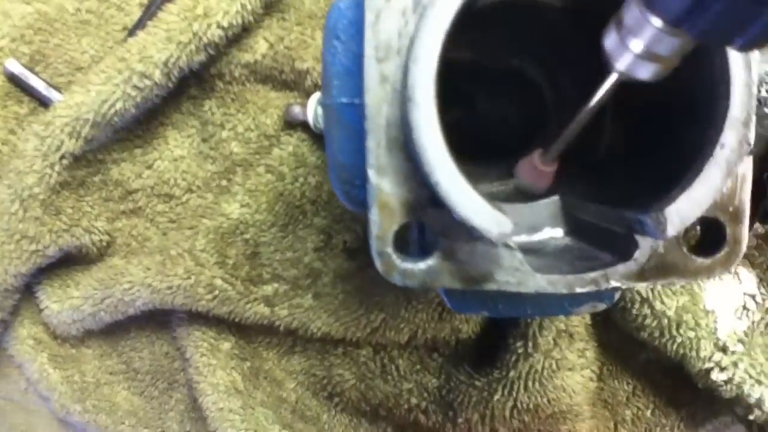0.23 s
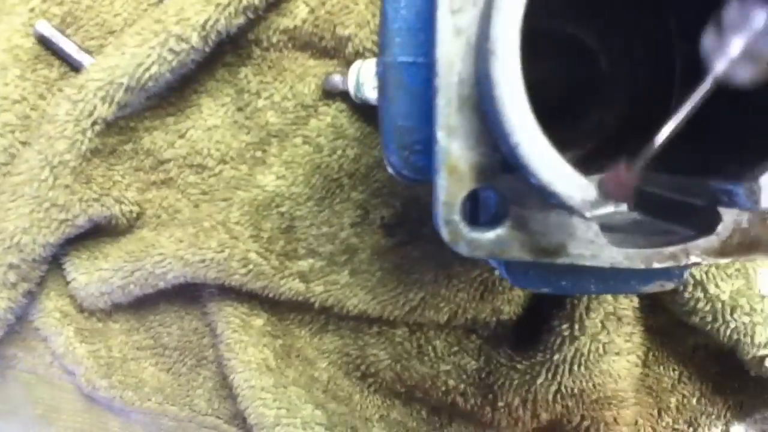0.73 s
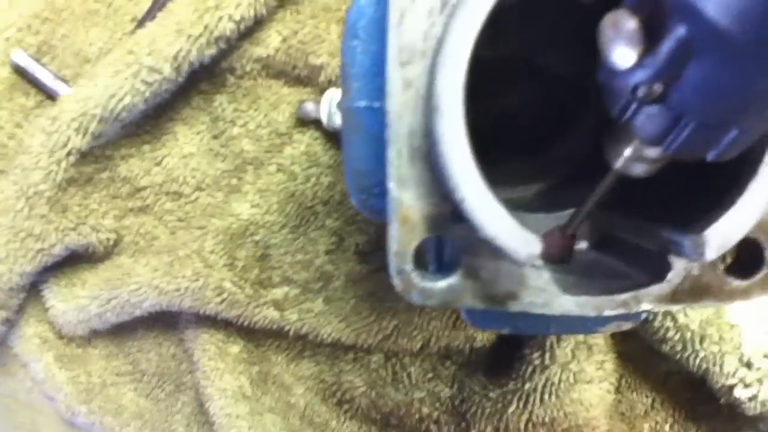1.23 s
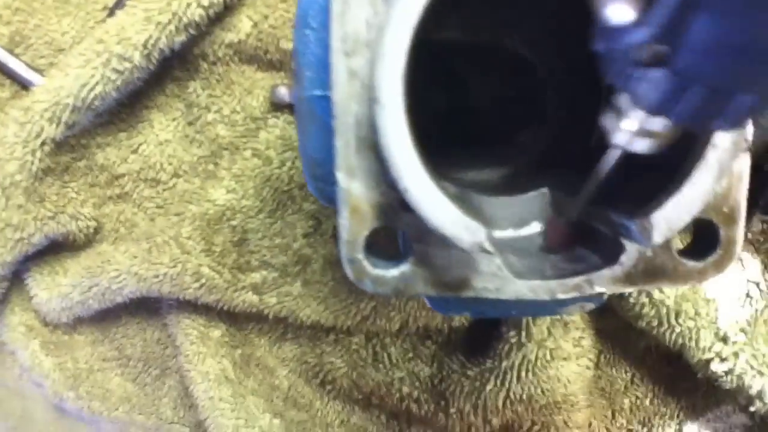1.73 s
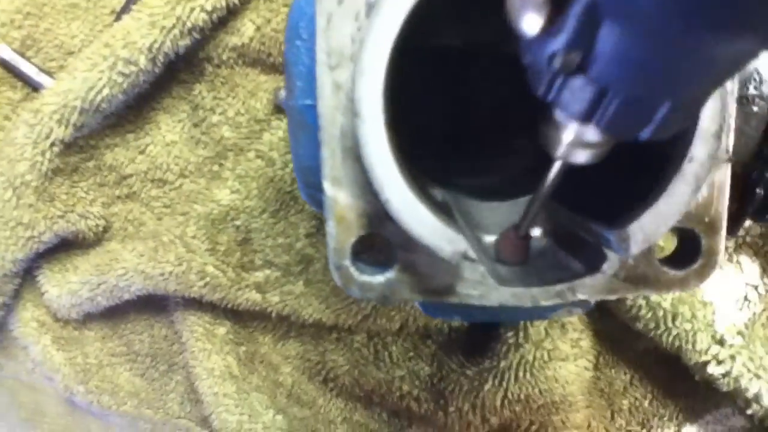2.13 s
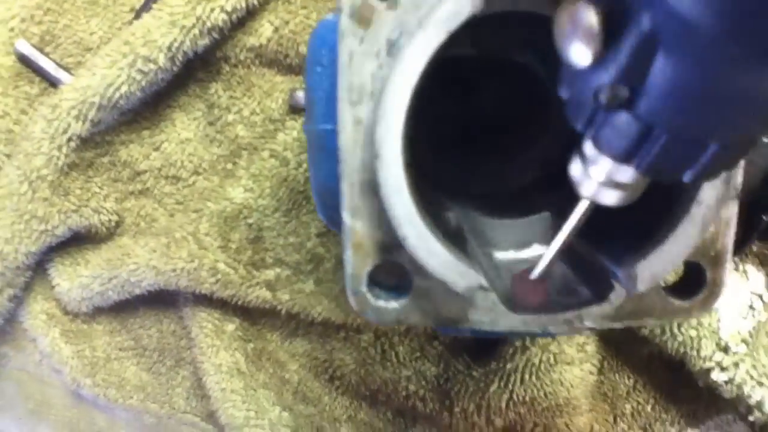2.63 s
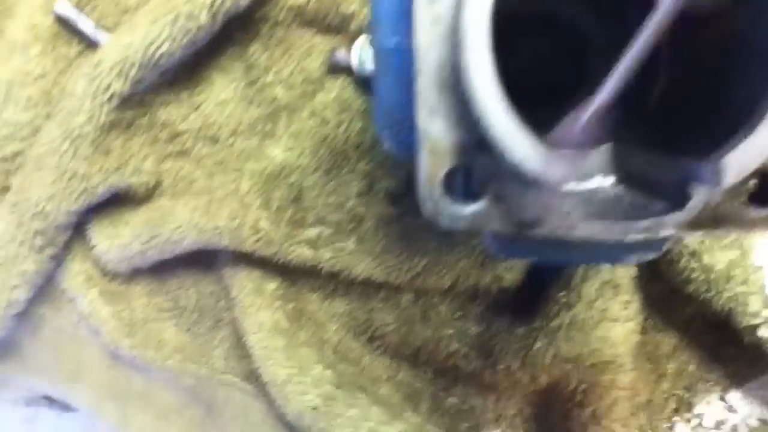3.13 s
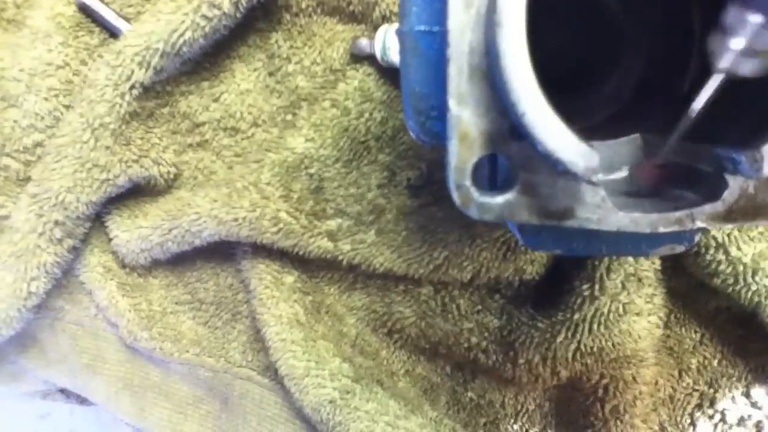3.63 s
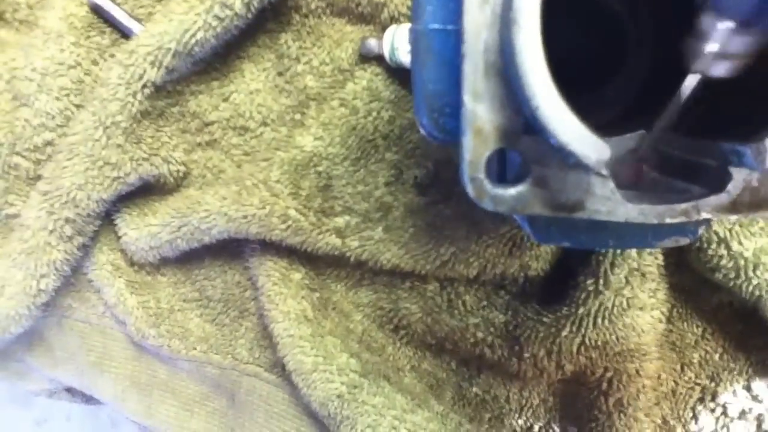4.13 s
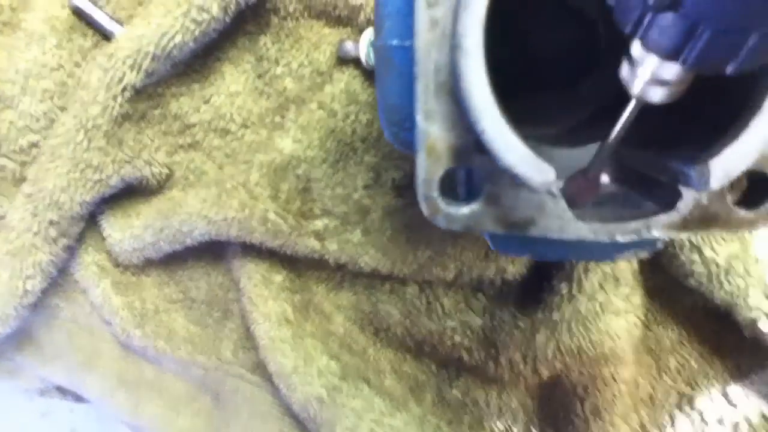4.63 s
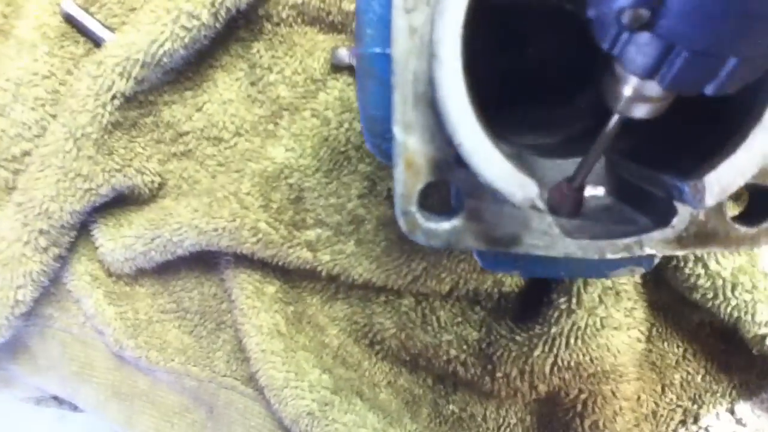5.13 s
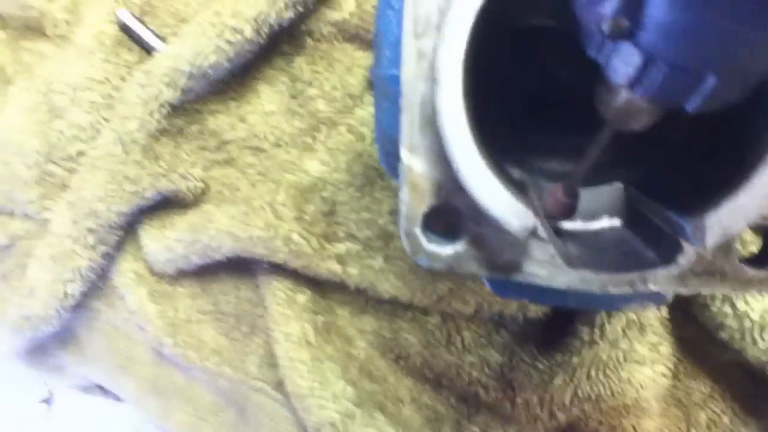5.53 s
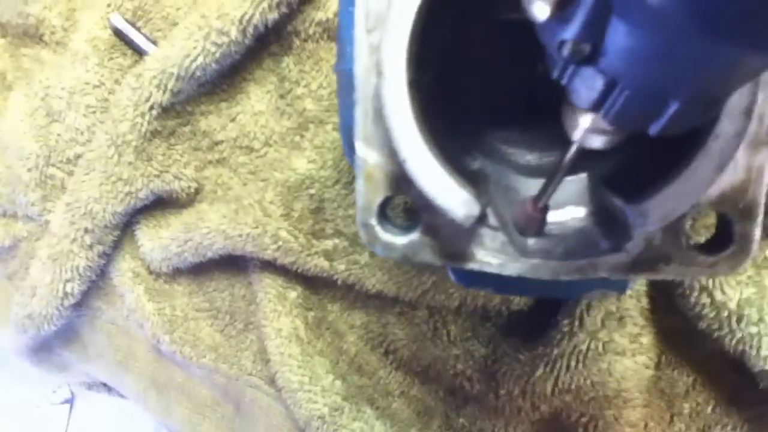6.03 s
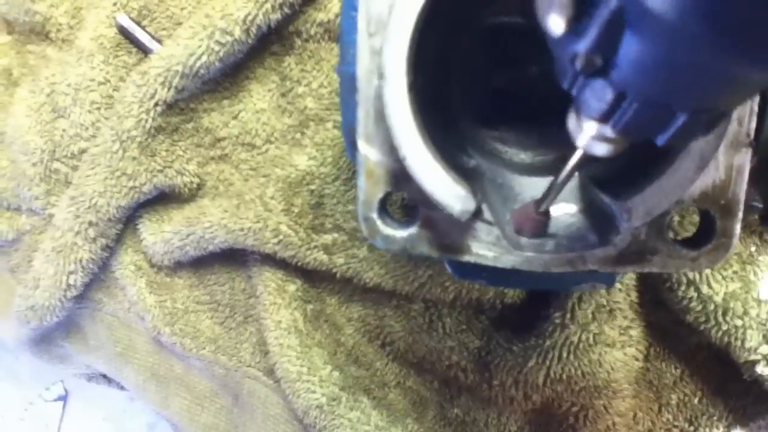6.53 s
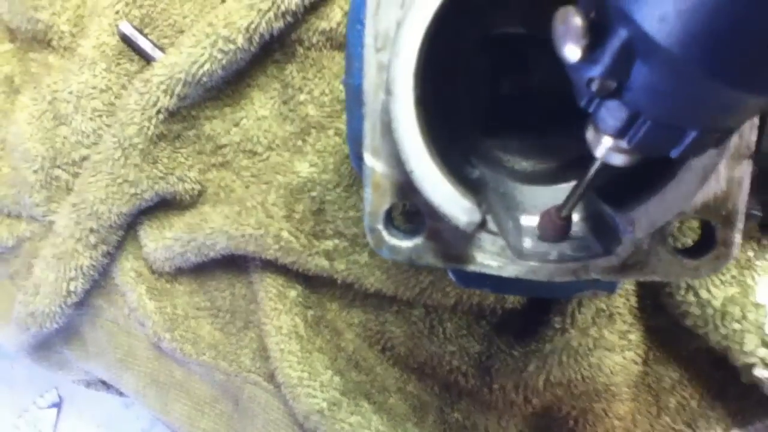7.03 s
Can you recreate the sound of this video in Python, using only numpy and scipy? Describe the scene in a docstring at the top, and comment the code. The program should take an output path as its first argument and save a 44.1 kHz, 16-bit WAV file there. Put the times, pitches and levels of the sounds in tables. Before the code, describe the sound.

A small rotary tool whines at high pitch while its stone bit grinds metal with a rough, ringing, hissing scrape.

```python
"""Beside an engine cylinder, a handheld rotary tool runs free, then its stone bit grinds the rim.
Grit tears at the metal once or twice a turn: it scrapes, hisses and rings the cylinder's metal liner
near 5.7 kHz. Now and then the stone skips off. The motor whines at multiples of its shaft speed
and rattles its housing. A phone close by limits the peaks."""
import sys
import numpy as np
from scipy import signal
from scipy.fft import rfft, irfft
from scipy.io import wavfile
from scipy.ndimage import uniform_filter1d, minimum_filter1d

SR = 44100
rng = np.random.default_rng(int(sys.argv[2]) if len(sys.argv) > 2 else 0)


def to_wav(s):
    """Save 16-bit WAV."""
    ch = np.atleast_2d(s).T  # columns
    pcm = np.round(np.clip(ch, -1, 1) * 32767)  # PCM
    wavfile.write(sys.argv[1], SR, pcm.astype(np.int16))


N = 321930
T = np.arange(N) / SR

# each touch of the stone (lands [s], lifts [s], firmness [0-1], landing blow [dB], strength [dB])
TOUCHES = [(.934, 0.961, 0.5, 15, 3), (0.976, 1.012, 0.7, 16, 2.5), (1.018, 1.05, 0.5, 11, 0),
           (1.05, 1.065, 0.4, 9, -2.5), (1.095, 1.134, 0.2, 11, -0.5), (1.14, 1.193, 0.5, 2, -1),
           (1.19, 2.04, 0.84, 5, -0.5), (2.078, 2.807, 0.96, 7, 0), (2.857, 2.975, 0.8, 7.5, -1),
           (2.967, 3.042, 0.4, 3, -2), (3.047, 3.073, .6, 5, 0.5), (3.093, 3.13, 0.5, -11, 4.5),
           (3.138, 3.164, 0.6, 0, 4.5), (3.653, 3.781, 1, 8, 1.5), (3.794, 3.973, 0.8, 4, -0.5),
           (3.982, 5.356, 0.76, 6, 0.5), (5.351, 5.888, 0.82, 8, 0), (5.896, 7.4, 0.9, -1, 0)]
# the hand digs in (+) or eases off (-) (time [s], half-width [s], strength change [dB])
HAND_PUSHES = [(1.517, 0.05, 2.5), (1.544, 0.013, -5.5), (1.71, 0.026, 2.5), (2.0, 0.023, 1),
               (2.097, 0.026, -3.5), (2.18, 0.013, -0.5), (3.115, 0.009, 4.5), (2.59, 0.062, 1),
               (2.894, 0.021, -3.5), (3.91, .03, 0), (4.23, 0.025, 0), (4.702, 0.019, 0.5),
               (5.14, 0.025, 0), (4.295, .02, 0), (4.604, 0.017, 2), (5.302, .015, 1), (5.54, 0.017, 0.5),
               (5.58, .015, -3), (6.31, 0.015, 1), (6.52, 0.017, 0.5), (2.215, 0.024, 1), (3.847, 0.035, 3),
               (3.962, 0.019, 5), (3.99, 0.021, -3), (4.93, 0.026, 2), (5.93, 0.061, -4.5),
               (6.067, .03, -2), (6.426, 0.032, -2), (6.553, 0.013, -1.5)]
# base levels of the grinding (time [s], scrape [dB], ring [dB], hiss [dB])
GRIND_LEVELS = [(.93, -21.5, -17.5, -27.5), (1.15, -20.5, -20, -24.5), (1.22, -15, -15.5, -15),
                (1.45, -20.5, -19, -19.5), (1.7, -19.5, -14, -20.5), (2.0, -17.5, -17, -17.5),
                (2.25, -18.5, -13, -19), (2.5, -20.5, -11.5, -21), (2.8, -20.5, -14, -21),
                (2.9, -19, -21, -24.5), (3.2, -25, -26, -28.5), (3.66, -22, -14.5, -21),
                (4.4, -20, -14, -19), (4.45, -22.5, -13, -21.5), (5.0, -20.5, -15.5, -22),
                (5.2, -18, -14, -19), (5.43, -23, -23, -25.5), (5.8, -14, -15.5, -15.5),
                (6.0, -16, -13, -14.5), (6.3, -16, -11, -15.5), (6.45, -17.5, -13, -19.5),
                (7.3, -17.5, -12.5, -17)]
# where the bit is (time [s], place [0 at the edge of the port opening, 1 further round the rim])
BIT_PLACE = [(.9, 0.12), (1.3, 0.52), (3.0, 0.39), (3.65, .3), (4.0, 0.52), (4.5, 0.26), (5.2, 0.23),
             (5.5, 0.97), (7.3, 0.72)]
# the liner's ringing notes (pitch [Hz], width [Hz], at the port [dB], round the rim [dB], sign [+/-1])
LINER_NOTES = [(5225, 40, -11, -10, 1), (5372, 55, -12, -12, -1), (5525, 52, 0, 0, 1),
               (5645, 40, -7, -9, 1), (5725, 40, -4, -8, 1), (5835, 70, -4, -5, 1), (5935, 60, 1, -7, -1),
               (6160, 45, -25, -11, -1), (6830, 150, -25, -21, 1)]
# grit heard through the tool and the cylinder's body (frequency [Hz], relative level [dB])
SCRAPE_SPECTRUM = [(40, -71), (150, -29.5), (320, -19.5), (600, -20), (1000, -6), (1600, 0), (1900, -3),
                   (2300, -6), (2750, -4), (3150, -1), (3700, 2), (4200, -1.5), (5000, 5), (6400, -26)]
# the grit's high hiss (frequency [Hz], relative level [dB])
HISS_SPECTRUM = [(4500, -33.5), (6300, -2.5), (7000, 3.5), (7700, -1.5), (8500, 2.5), (9200, -3.5),
                 (10300, -5.5), (11000, -0.5), (11700, 4.5), (12400, 1.5), (13300, -20), (13700, -0.5),
                 (14200, -30.5)]
# how the hiss changes round the rim (frequency [Hz], relative change [dB])
RIM_HISS_CHANGE = [(6300, -0.5), (7600, -5.5), (8700, -1.5), (9100, 11.5), (9600, 3.5), (11700, -5.5),
                   (13000, -7), (14200, -1)]
# the motor's shaft (time [s], speed [turns/s], base level of its lowest tone [dB])
MOTOR_RUN = [(0, 206.8, -37), (.92, 206.9, -38.5), (.97, 205.9, -47), (1.2, 205.7, -46), (1.36, 196.5, -54),
             (1.6, 199.4, -49), (2.05, 196.3, -52), (2.57, 196.8, -52), (2.72, 190.5, -56),
             (3.1, 199.4, -43), (3.2, 199.9, -46), (3.4, 204.1, -45), (3.64, 205.7, -42), (3.7, 203.8, -51),
             (3.8, 200.9, -55), (3.92, 190.8, -60), (4.1, 190.8, -58), (4.26, 195, -56), (4.45, 191.5, -57),
             (4.82, 192, -58), (4.92, 188.8, -58), (5.2, 191, -54), (5.5, 200.6, -47), (5.72, 203.3, -44),
             (5.9, 191.5, -56), (6.1, 193.4, -46), (6.25, 192.8, -46), (6.42, 190.4, -52),
             (6.62, 195.2, -52), (6.9, 191, -53), (7.3, 189.6, -52)]
# the motor's lower tones (multiple of shaft speed [x], relative level [dB])
LOW_TONES = [(1, -11), (2, -28), (3, -22.5), (4, -18), (5, -1), (6, -10), (7, -9.5), (8, -4), (9, -8),
             (10, -10), (11, -5.5), (12, -14.5)]
# its strongest upper tones (multiple of shaft speed [x], relative level [dB])
HIGH_TONES = [(13, -9), (15, -8), (18, -7), (33, -8), (45, -14), (56, -16), (60, -12), (67, -19)]
# side load on the bearings shifts some tones {multiple of shaft speed [x]: change at full load [dB]}
BEARING_SHIFTS = {3: -0.5, 5: -10, 6: 2.5, 8: -1, 9: 3}
# tone of the bit rocking twice a turn (time [s], level [dB])
ROCKING_LEVELS = [(0, -61.5), (.92, -56), (.97, -61), (4.0, -61), (4.75, -57), (4.92, -48), (5.2, -57),
                  (5.5, -77), (6.5, -59), (6.9, -42.5), (7.3, -46)]
# the housing's rattle (frequency [Hz], relative level [dB])
HOUSING_SPECTRUM = [(40, -31), (150, -28.5), (650, -29.5), (850, -14), (1850, -12), (2300, -1.5),
                    (2600, -7.5), (3750, 0.5), (4050, -8.5), (4800, -8.5), (5800, -9.5), (7700, -19),
                    (9200, -14.5), (10300, -27.5), (11900, -29), (12400, -19), (14200, -28)]


def grinding(turns, hop_db, place, scrape_gain, ring_db, hiss_db):
    """The same tearing grit makes the ring, the scrape and the hiss."""
    tearing = ticks(turns, per_s=5000, spread_db=1.5, once=.1, twice=.33, noise=1.5)
    grit = unit(undb(hop_db + .85 * wander(150)) * tearing)
    ring = liner_ring(grit, place, ring_db)
    port_hiss = colour(grit, HISS_SPECTRUM)
    hiss = (1 - place) * port_hiss + place * colour(port_hiss, RIM_HISS_CHANGE)
    return ring + scrape_gain * colour(grit, SCRAPE_SPECTRUM) + undb(hiss_db) * hiss


def liner_ring(grit, place, ring_db):
    """Grit rings the liner like a bell; each note is reached more or less well as the bit wanders."""
    ring = 0
    for hz, width, port_db, rim_db, sign in LINER_NOTES:
        b, a = signal.iirpeak(hz, hz / width, fs=SR)
        reach_db = port_db + place * (rim_db - port_db) + 1.5 * wander(5)
        ring += sign * signal.lfilter(b, a, grit * undb(ring_db + reach_db))
    return unit(ring) * np.sqrt(np.mean(undb(ring_db) ** 2))


def stone_contact(land_s=.003, lift_s=.011):
    """The stone lands fast and lifts more slowly. Gives firmness, touch (0 off, 1 on) and strength."""
    firmness, touch, strength_db = np.zeros((3, N))
    for lands, lifts, firm, _, db in TOUCHES:
        on = np.clip((T - lands) / land_s, 0, 1) * np.exp(-np.maximum(T - lifts, 0) / lift_s)
        firmness = np.maximum(firmness, firm * on)
        touch = np.maximum(touch, on)
        strength_db[T >= lands] = db
    for time, half_width, db in HAND_PUSHES:
        strength_db += db * np.exp(-((T - time) / half_width) ** 2)
    return firmness, touch, strength_db


def stone_hops(shaft_hz, hops_per_s=68):
    """Level swings in dB as the stone hops; a lightly pressed, faster bit hops harder."""
    hops = np.cumsum(hops_per_s * (1 + .2 * wander(40))) / SR
    size = .3 + .7 * rng.random(N // 200)[hops.astype(int)]
    depth = 2.2 * np.clip(5 + .9 * (shaft_hz - 192), 4, 15)
    part = hops % 1
    hit_and_fade = np.minimum(part / .2, 1) * np.exp(-part / .4) - .3
    hop_db = depth * size * hit_and_fade
    for lands, _, _, blow_db, _ in TOUCHES:  # a dip just before each landing, then a jump
        gap = np.abs(T - lands)
        hop_db += blow_db * np.where(T >= lands, np.exp(-gap / .006), -np.exp(-gap / .005))
    return hop_db


def motor_whine(turns, tone_db, rock_db, load):
    """The motor sings at multiples of its shaft speed; under load the tones waver and blur."""
    levels = {k: -15 - .093 * (k - 13) + 1.9 * rng.standard_normal() for k in range(13, 69)}
    levels.update({round(k): db for k, db in LOW_TONES + HIGH_TONES})
    # under load the upper tones lose less than the lowest one
    upper_db = load * (.68 * (tone_db[0] - tone_db) - 2)
    whine = undb(rock_db) * np.sin(4 * np.pi * turns)
    for k, db in levels.items():
        load_db = load * (BEARING_SHIFTS.get(k, 0) - 2.8 * (k > 9)) + upper_db * (k > 2)
        waver_db = (.96 + 2.9 * load * (k > 1)) * wander(12)
        blur = .5 * load * wander(25) * (k > 1)
        tone = np.sin(2 * np.pi * (k * turns + rng.random()) + blur)
        if k != 2:  # the rocking bit supplies the second tone
            whine += undb(tone_db + db - LOW_TONES[0][1] + load_db + waver_db) * tone
    return np.sqrt(2) * whine


def housing_rattle(turns):
    """Loose bearings and the bit's clamp knock the housing, mostly once a turn."""
    knocks = ticks(turns, per_s=2500, spread_db=2.2, once=.3, twice=.1, noise=.9)
    return colour(undb(2 * wander(150)) * knocks, HOUSING_SPECTRUM)


def ticks(turns, per_s, spread_db, once, twice, noise):
    """Random ticks of uneven size over smooth noise, harder at one or two places of each turn."""
    hits = (rng.random(N) < per_s / SR) * rng.standard_normal(N)
    sizes = undb(spread_db * np.minimum(rng.exponential(size=N), 3))
    beat = np.exp(once * np.cos(2 * np.pi * turns) + twice * np.cos(4 * np.pi * turns))
    return unit(beat * (unit(hits * sizes) + noise * rng.standard_normal(N)))


def colour(x, spectrum):
    """Give a sound the listed balance of low and high frequencies, at an average level of 1."""
    hz, db = np.transpose(spectrum)
    grid_hz = np.maximum(np.fft.rfftfreq(2048, 1 / SR), 1)
    gain = undb(np.interp(np.log(grid_hz), np.log(hz), db))
    cepstrum = irfft(np.log(gain))
    # fold it so the filter rings after each tick, never before
    cepstrum[1:1024] *= 2
    cepstrum[1025:] = 0
    response = irfft(np.exp(rfft(cepstrum)))
    return unit(signal.fftconvolve(x, response)[:N])


def wander(per_s):
    """A smooth random drift, about 1 in size, with per_s new values a second."""
    hold = int(SR / per_s)
    steps = np.repeat(rng.standard_normal(N // hold + 1), hold)
    return unit(uniform_filter1d(uniform_filter1d(steps, hold), hold)[:N])


def curves(table):
    """Turn a table's columns into curves over time."""
    times, *columns = np.transpose(table)
    return [np.interp(T, times, column) for column in columns]


def undb(db):
    """Turn decibels into a gain."""
    return 10 ** (np.asarray(db) / 20)


def unit(x):
    """Scale to an average (rms) level of 1."""
    return x / np.sqrt(np.mean(x ** 2))


def scene():
    """The motor runs throughout; grinding takes over from the rattle as the bit bites."""
    shaft_hz, tone_db = curves(MOTOR_RUN)
    scrape_db, ring_db, hiss_db = curves(GRIND_LEVELS)
    (place,), (rock_db,) = curves(BIT_PLACE), curves(ROCKING_LEVELS)
    firmness, touch, strength_db = stone_contact()
    load = uniform_filter1d(firmness, size=2000)
    turns = np.cumsum(shaft_hz * (1 + .0003 * wander(40))) / SR  # the speed trembles a little
    hop_db = stone_hops(shaft_hz)
    # off the metal, the rattle weakens as the shaft slows
    free_db = np.maximum(-17 + 2.5 * (shaft_hz - shaft_hz[0]), -28)
    body_db = touch * (scrape_db + strength_db) + (1 - touch) * free_db
    shake_db = .79 * np.sqrt(firmness) * hop_db  # each hop also shakes the housing
    rattle = undb(body_db + shake_db) * np.sqrt(1 - .64 * firmness) * housing_rattle(turns)
    scrape_gain = undb(body_db - 1.67) * np.sqrt(1.25 * firmness)
    touch_db = 20 * np.log10(np.clip(touch, 1e-3, 1))
    # ring and hiss follow strength more steeply than the scrape
    ring_db += 2.31 * strength_db + touch_db
    hiss_db += 1.74 * strength_db + touch_db
    stone = grinding(turns, hop_db, place, scrape_gain, ring_db, hiss_db)
    return (stone + motor_whine(turns, tone_db, rock_db, load) + rattle)[None]


def record(dry, low_hz=90, top_hz=14080, ceiling=.9):
    """The phone drops the deep bass, quickly turns down loud peaks and cuts the highest treble."""
    thin = signal.sosfilt(signal.butter(2, low_hz, "high", fs=SR, output="sos"), dry)
    safe_gain = np.minimum(1, ceiling / (np.abs(thin) + 1e-9))
    gain = uniform_filter1d(minimum_filter1d(safe_gain, size=89), size=89)
    return signal.sosfilt(signal.ellip(16, .2, 95, top_hz, fs=SR, output="sos"), thin * gain)


dry = scene()
out = record(dry)
to_wav(out)
```